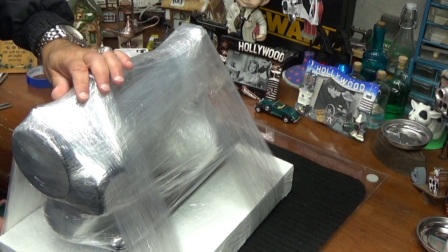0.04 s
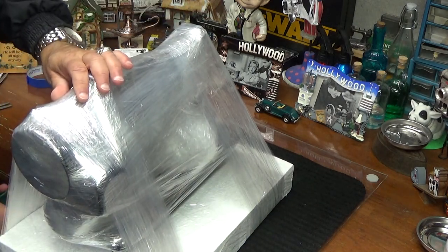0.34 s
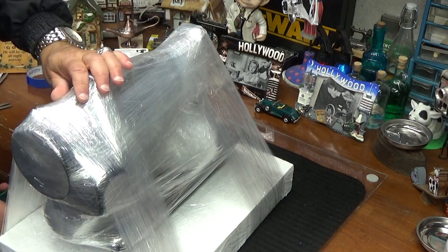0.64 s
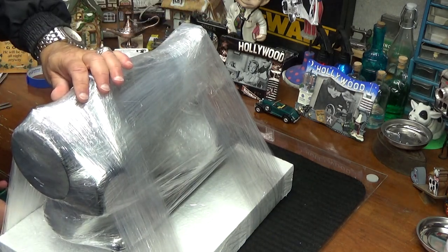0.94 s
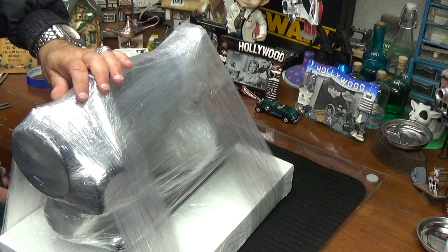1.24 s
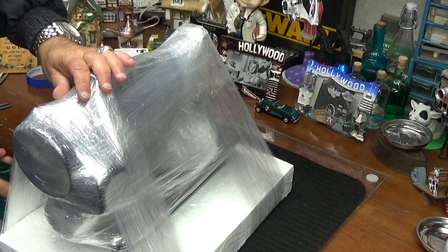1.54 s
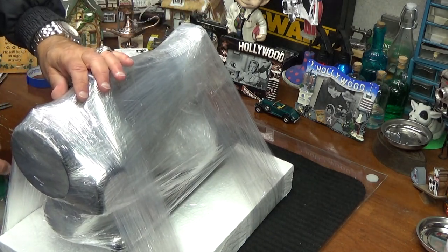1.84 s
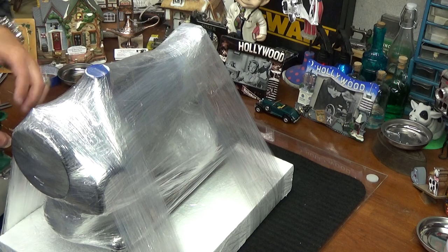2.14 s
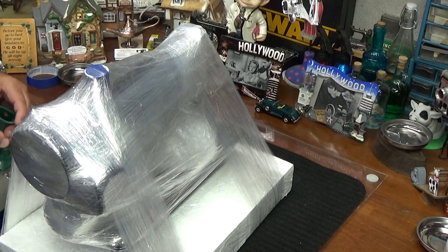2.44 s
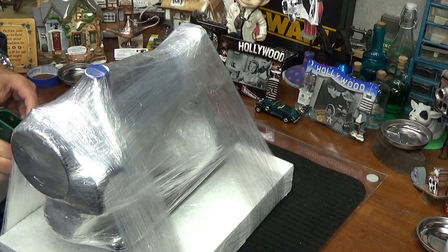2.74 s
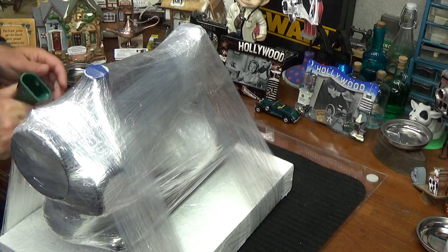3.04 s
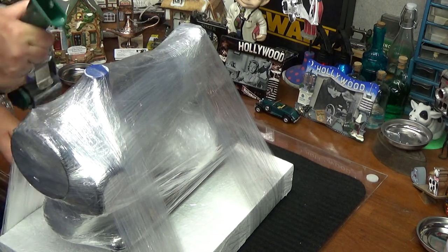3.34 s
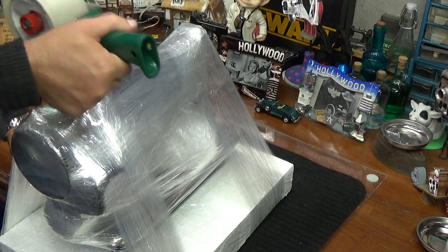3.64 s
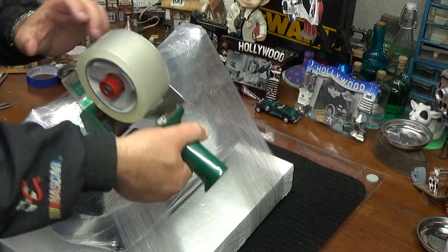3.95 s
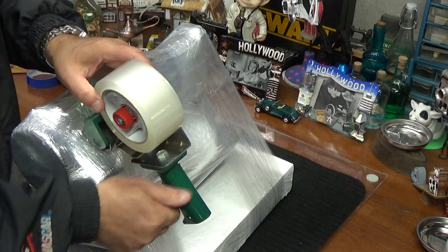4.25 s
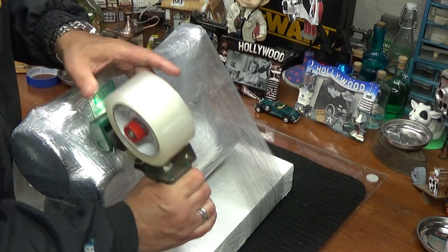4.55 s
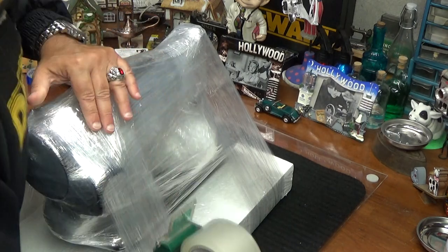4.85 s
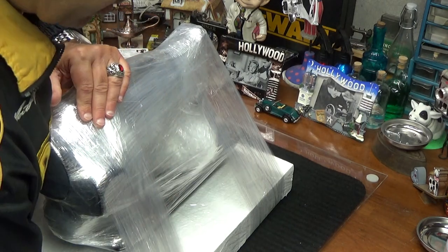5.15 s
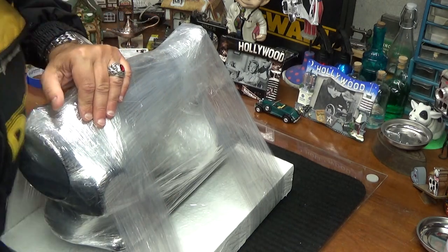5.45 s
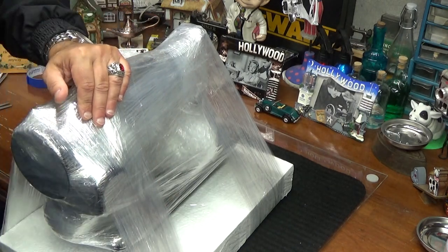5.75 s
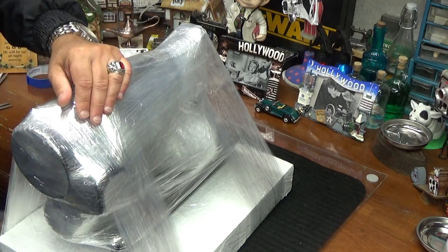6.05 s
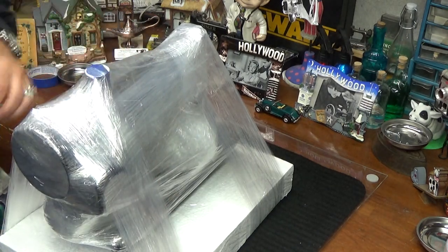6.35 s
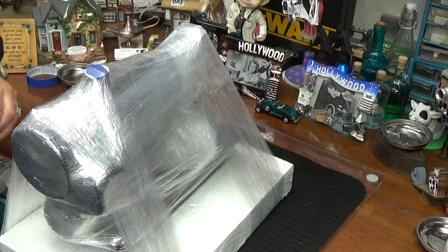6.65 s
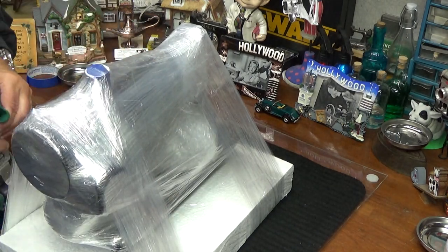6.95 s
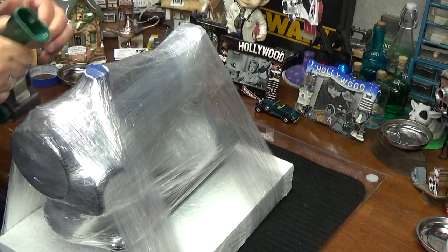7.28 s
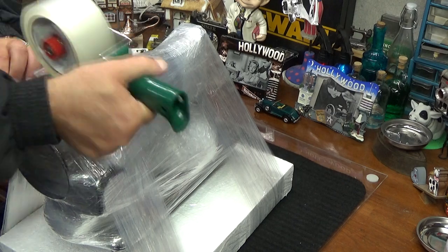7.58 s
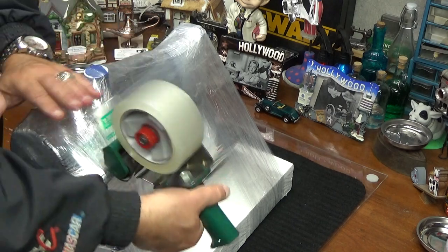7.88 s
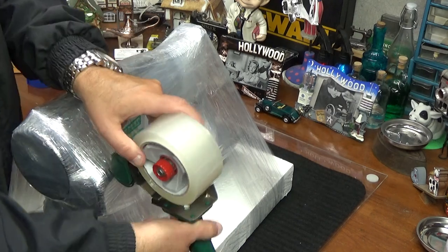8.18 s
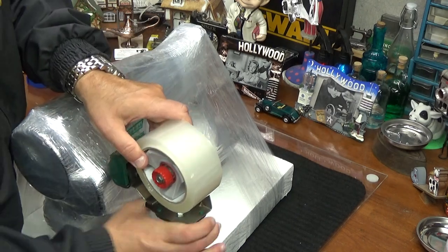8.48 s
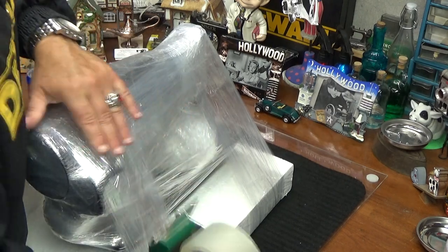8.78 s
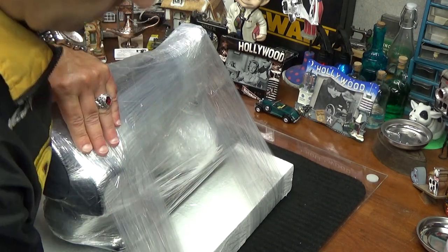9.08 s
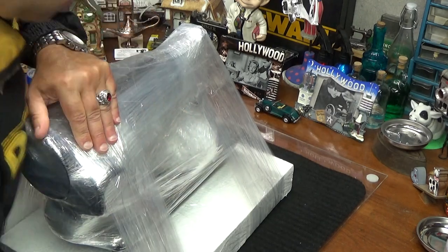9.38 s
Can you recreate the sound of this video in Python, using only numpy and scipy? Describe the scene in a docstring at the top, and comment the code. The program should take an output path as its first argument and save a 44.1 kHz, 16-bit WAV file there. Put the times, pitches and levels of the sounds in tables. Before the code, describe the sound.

Close by in a small workshop, short crackling tugs and quick zips free packing tape from its roll. Longer rasping pulls follow, squealing as they speed up and resonating in the plastic wrap the tape is wound around, with shorter pulls in between. The pauses hold faint crinkling of film and small snaps of creases being pressed down, over a low, even room noise.

```python
"""Short tugs crack packing tape off a hand dispenser; film rustles under a hand and creases tick.
Then the tape is pulled out and wound round a film-wrapped machine on a workshop bench.
It leaves the roll in quick stick-slip jerks: they rasp and squeal in the taut strip and boom in the
wrap, while threads of glue fizz. A small cluttered room answers over its own soft steady noise."""
import sys
import numpy as np
from scipy import signal
from scipy.fft import rfft, irfft, next_fast_len
from scipy.io import wavfile
from scipy.ndimage import uniform_filter1d

SR = 44100
rng = np.random.default_rng(int(sys.argv[2]) if len(sys.argv) > 2 else 0)


def output_pcm(signal):
    """Save a mono or channel-first signal as 16-bit PCM at the path in sys.argv[1].

    Samples are clipped to [-1, 1] before scaling.
    """
    pcm = np.clip(np.atleast_2d(signal).T, -1, 1) * 32767
    wavfile.write(sys.argv[1], SR, np.round(pcm).astype(np.int16))


N = 419832
TIME_S = np.arange(N) / SR
FFT_SIZE = 2 * next_fast_len(N // 2 + SR, True)
FREQ_HZ = np.fft.rfftfreq(FFT_SIZE, 1 / SR)
LEFT_RIGHT = np.array([[1], [-1]])


def undb(db):
    """Decibels to gain."""
    return 10 ** (np.asarray(db) / 20)


def unit(x):
    """Scale to rms 1."""
    return x / np.sqrt(np.mean(x ** 2))


def even(x, span_s=.05):
    """Hold the short-term rms at 1, leaving the fast grain."""
    return x / np.sqrt(np.abs(uniform_filter1d(x ** 2, int(span_s * SR))) + 1e-12)


def walk(rate_hz):
    """Ramps between random levels, rms 1."""
    hold = max(int(SR / rate_hz), 1)
    steps = np.repeat(rng.standard_normal(N // hold + 1), hold)
    return unit(uniform_filter1d(steps, hold)[:N])


def gate(start_s, end_s, edge_s):
    """1 between two moments, with linear ramps."""
    return np.clip(np.minimum(TIME_S - start_s, end_s - TIME_S) / edge_s + .5, 0, 1)


def bump(peak_s, half_s):
    """Gaussian swell, 1/e at half_s from its peak."""
    return np.exp(-((TIME_S - peak_s) / half_s) ** 2)


def cut(x, hz, kind, order=4):
    """Butterworth filter."""
    return signal.sosfilt(signal.butter(order, hz, kind, fs=SR, output="sos"), x)


def fade(x, decay_s):
    """Give every impulse an exponential tail."""
    return signal.lfilter([1], [1, -np.exp(-1 / (decay_s * SR))], x)


def colour(x, spectrum, resonances=()):
    """Minimum-phase filter from a spectrum plus resonances; white noise keeps its power."""
    hz, db = np.transpose(spectrum)
    curve_db = np.interp(np.log(FREQ_HZ + 1), np.log(hz), db)
    for centre_hz, width_hz, lift_db in resonances:
        curve_db += lift_db / (1 + (2 * (FREQ_HZ - centre_hz) / width_hz) ** 2)
    cepstrum = irfft(np.log(unit(undb(curve_db))))
    cepstrum[1:FFT_SIZE // 2] *= 2
    cepstrum[FFT_SIZE // 2:] = 0
    return irfft(np.exp(rfft(cepstrum)) * rfft(x, FFT_SIZE))[..., :N]


# still room: f/Hz, level/dB
ROOM_SPECTRUM = [(12, -24), (20, -9), (81, -4.5), (182, -8), (422, -3), (558, -8.5), (607, -2), (738, -9),
                 (1000, -8), (1150, -10.5), (6720, -17.5), (11400, -24.5), (16000, -42)]


def room_tone(level_db=-55.5, sway_db=.8, side_db=-11):
    """Soft steady noise of the workshop, nearly the same left and right."""
    gain = undb(level_db + sway_db * walk(5))
    mid, side = colour(rng.standard_normal((2, N)), ROOM_SPECTRUM) * gain
    return mid + undb(side_db) * side * LEFT_RIGHT


# resonances of wrap, roll and dispenser: f/Hz, width/Hz, lift/dB
BODY_MODES = [(198, 19, 5.5), (382, 50, -2), (689, 50, 5.5), (960, 86, 3), (1326, 38, 1.5),
              (1710, 46, -3.5), (2185, 36, 4.5), (3150, 48, 0.5), (4530, 260, 1), (8100, 30, 2),
              (10220, 2300, 4.5)]
# tugged strip: f/Hz, level/dB
TUG_SPECTRUM = [(71, -63), (120, -28.5), (557, -2), (789, -15.5), (1400, -5.5), (1790, -7.5), (2290, -3),
                (3740, -8), (4500, -8), (9020, -12.5), (16000, -27.5)]
# tugs freeing a few millimetres of tape: t/s, level/dB
TUG_EVENTS = [(0.0034, -8), (0.092, -10), (0.1061, -10), (0.1745, -3.5), (0.2181, -0.5), (0.521, -16.5),
              (0.598, -3), (0.9615, -2), (1.051, -2.5), (1.0794, -2.5), (1.6838, -8.5), (1.6913, -8.5),
              (5.2728, -24), (6.9037, -18)]


def tugs(slip_hz=240, snap_s=.0012, length_s=.0099, level_db=-6, low_db=1):
    """A tug is a handful of slow slips, each a brief crack of the strip."""
    force = np.zeros(N)
    slip = np.arange(8)
    for start_s, db in TUG_EVENTS:
        delay_s = (slip + .15 * rng.standard_normal(len(slip)) * (slip > 0)) / slip_hz
        at = (np.abs(start_s + delay_s) * SR).astype(int)
        force[at] += undb(db) * np.exp(-(delay_s / length_s) ** 2)
    bright, low = fade(force, snap_s) * rng.standard_normal((2, N))
    bright = cut(bright, 810, "highpass", order=2)
    low = cut(low, [260, 1000], "bandpass", order=2)
    return undb(level_db) * colour(bright + undb(low_db) * low, TUG_SPECTRUM, BODY_MODES)


# creases, rustling or ticking: f/Hz, level/dB
CREASE_SPECTRUM = [(180, -29), (300, -9.5), (1780, -5), (3290, 1), (3640, -2.5), (4370, -1.5), (9880, -1),
                   (13300, -9), (16000, -25)]
# hand smoothing the film: start/s, end/s, level/dB
HAND_RUBS = [(0.312, 1.003, -51.5), (2.329, 2.899, -50.5), (3.899, 4.6, -51.5), (6.549, 7.001, -53.5),
             (7.802, 8.301, -54)]


def rustle(grain_db=4, swell_db=4, level_db=-3, edge_s=.092):
    """Faint crinkling of the film under the hand."""
    grains = unit(rng.standard_normal(N) * undb(grain_db * walk(640) + swell_db * walk(30)))
    rubbing = sum(gate(start_s, end_s, edge_s) * undb(db + level_db) for start_s, end_s, db in HAND_RUBS)
    return colour(grains, CREASE_SPECTRUM) * rubbing


# snapping creases: t/s, level/dB, snap count
CREASE_SNAPS = [(0.7885, -17.5, 2), (0.9415, -20.5, 1), (2.468, -11.5, 1), (2.6178, -22.5, 1),
                (2.689, -13, 1), (4.1433, -10, 1), (4.5167, -16, 2), (4.574, -16.5, 1), (6.9327, -16.5, 2),
                (7.9042, -6, 3), (8.1975, -16.5, 1), (8.3008, -9, 1), (8.3525, -16.5, 1),
                (8.5014, -20.5, 1), (8.5577, -15, 3)]


def ticks(level_db=-3.5, snap_s=.001, gap_s=.016):
    """Creases of tape and film snap as they are pressed down, singly or in a short run."""
    force = np.zeros(N)
    for start_s, db, count in CREASE_SNAPS:
        times_s = start_s + gap_s * np.arange(round(count))
        force[(times_s * SR).astype(int)] += undb(db)
    snaps = fade(force, snap_s) * rng.standard_normal(N)
    return undb(level_db) * colour(snaps, CREASE_SPECTRUM)


# short pulls: start/s, end/s, base slip rate/Hz, rasp/dB, boom/dB, fizz/dB
SHORT_STROKES = [(1.08, 1.238, 499.7, -20, -27, -21), (1.698, 1.844, 420.5, -22, -24, -20),
                 (1.879, 1.91, 259.8, -22, -17.5, -19.5), (1.938, 2.073, 215.4, -22, -26.5, -19.5),
                 (2.1, 2.132, 260, -20, -23, -23), (3.656, 3.876, 418.3, -22.5, -27, -19.5),
                 (5.297, 5.453, 400, -19.5, -26.5, -19.5), (5.501, 5.529, 420, -24.5, -22, -25),
                 (6.344, 6.515, 215, -20.5, -23, -23.5), (9.172, 9.54, 396.4, -18.5, -27.5, -19.5)]
# long pulls: start/s, end/s, base slip rate/Hz, boom/dB, fizz/dB, unevenness/0-1
LONG_STROKES = [(2.902, 3.643, 440.1, -26, -21, .7), (4.597, 5.16, 359.9, -30, -18.5, .4),
                (5.562, 6.31, 539.9, -24.5, -21, .16), (6.989, 7.763, 370.5, -28.5, -21, .55),
                (8.599, 9.145, 419.3, -30.5, -18, 0.42)]
# arm effort, one curve per long pull: t/s, rasp level/dB
EFFORT_CURVES = [
    [(2.915, -25.5), (2.929, -27), (2.935, -21.5), (3.111, -15.5), (3.481, -21.5), (3.559, -28),
     (3.635, -29)],
    [(4.625, -23.5), (4.659, -24), (4.775, -25), (4.825, -23), (4.979, -24), (5.057, -21), (5.15, -19.5)],
    [(5.575, -19.5), (5.703, -20), (5.729, -23), (5.907, -21), (5.931, -22.5), (6.193, -17.5), (6.3, -24)],
    [(7.0, -17.5), (7.16, -16), (7.362, -18.5), (7.422, -22), (7.598, -20), (7.755, -29.5)],
    [(8.615, -31), (8.701, -25.5), (8.955, -30), (8.981, -21), (9.023, -27.5), (9.061, -19), (9.135, -17.5)],
]
# arm speeding up, slips quickening to a screech: peak/s, rise/s, fall/s, height/octaves
ARM_SURGES = [(1.172, .04, .045, .4), (1.745, .025, 0.068, 0.64), (3.045, 0.049, .18, 1.72),
              (5.1, .18, .15, .8), (5.365, .04, 0.049, .4), (6.11, .05, .1, 1.06), (7.18, .09, 0.17, 1.15),
              (9.06, .06, .12, 0.67)]


def pulls(spin_s=.03, spin_octaves=.35, breakaway_db=.5, breakaway_s=.0027, usual_effort_db=-21.5,
          surge_db_per_octave=4, short_unevenness=.17, boom_build_s=.0056, boom_limit_hz=815):
    """The arm's speed and effort set slip rate, unevenness and the gains of rasp, boom and fizz."""
    surge_octaves = sum(octaves * bump(peak_s, np.where(TIME_S < peak_s, rise_s, fall_s))
                        for peak_s, rise_s, fall_s, octaves in ARM_SURGES)
    strokes = [(start_s, end_s, hz, boom_db, fizz_db, short_unevenness,
                rasp_db + surge_db_per_octave * surge_octaves)
               for start_s, end_s, hz, rasp_db, boom_db, fizz_db in SHORT_STROKES]
    strokes += [(*stroke, np.interp(TIME_S, *np.transpose(effort)))
                for stroke, effort in zip(LONG_STROKES, EFFORT_CURVES)]
    slip_hz, unevenness, gains = np.full(N, 300.), np.zeros(N), np.zeros((3, N))
    for start_s, end_s, base_hz, boom_db, fizz_db, uneven, effort_db in strokes:
        running = gate(start_s, end_s, edge_s=.0027)
        on = running > 0
        age_s, left_s = np.abs(TIME_S[on] - start_s), np.abs(end_s - TIME_S[on])
        # the roll takes a moment to spin up and to stop
        sag_octaves = spin_octaves * (np.exp(-age_s / spin_s) + np.exp(-left_s / spin_s))
        slip_hz[on] = base_hz * 2 ** (surge_octaves[on] - sag_octaves)
        unevenness[on] = uneven
        extra_db = effort_db[on] - usual_effort_db
        crack_db = breakaway_db * np.exp(-age_s / breakaway_s)
        # the wrap starts late and cannot follow very fast slips
        wrap = (1 - np.exp(-age_s / boom_build_s)) / np.hypot(1, (slip_hz[on] / boom_limit_hz) ** 5)
        rasp = undb(effort_db[on] + crack_db)
        boom = wrap * undb(boom_db + .99 * extra_db)
        fizz = undb(fizz_db + .05 * extra_db + crack_db)
        gains[:, on] = running[on] * [rasp, boom, fizz]
    return slip_hz, unevenness, gains


def slips(hz, wander, jitter=.07, size_db=3.5):
    """One lane of the peel line: a click at each slip, uneven in spacing and size."""
    step = hz * np.exp(wander * walk(45) + jitter * walk(600)) / SR
    phase = np.cumsum(step)
    at = np.flatnonzero(np.diff(np.floor(phase)))
    late_samples = np.clip(1 - phase[at + 1] % 1 / step[at], 0, 1)
    size = undb(size_db * walk(700))[at]
    clicks = np.zeros(N)
    clicks[at] += size * (1 - late_samples)
    clicks[at + 1] += size * late_samples
    return clicks


def stick_slip(hz, unevenness, lock_hz=965.8, edge_db=-4, flutter_db=-1.5):
    """Middle and edges of the tape slip separately; fast slips lock to one rate and sound cleaner."""
    loose = 1 / np.hypot(1, (hz / lock_hz) ** 4)
    middle = slips(hz, wander=.25 * unevenness * loose, jitter=.24 * unevenness * loose)
    edges = slips(hz, wander=.13 * loose) + slips(hz, wander=.22 * loose)
    return (middle + undb(edge_db) * edges) * undb(flutter_db * walk(150))


def glue_threads(jerks, snap_s=.00044, steady=.75, grain_db=2):
    """Every slip snaps a spray of glue threads; a steady share parts in between."""
    spray = even(fade(jerks, snap_s)) + steady
    return even(spray * rng.standard_normal(N) * undb(grain_db * walk(1500)))


# roll swinging close by: t/s, half length/s, top lift/dB
ROLL_PASSES = [(5.05, 1, 3), (7.6, .25, 2.5), (8.849, 0.52, 1.5)]


def glue_fizz(glue, lightness, split_hz=9500, far_top_db=-1.5, sizzle=.4):
    """Treble of the parting glue; its top comes through on light pulls and when the roll is near."""
    top_db = far_top_db + sum(db * bump(peak_s, half_s) for peak_s, half_s, db in ROLL_PASSES)
    body = cut(glue, split_hz, "lowpass", order=3)
    top = undb(top_db) * lightness ** sizzle * cut(glue, split_hz, "highpass", order=3)
    return even(cut(body + top, 3500, "highpass"))


# taut strip and wrap: f/Hz, level/dB
TAPE_SPECTRUM = [(53, -70), (90, -29), (205, -15), (265, -9), (380, 5.5), (499, -2.5), (690, 0), (780, -7),
                 (1210, -2.5), (1470, -2.5), (2590, -4.5), (3510, -9), (9930, -13.5), (13700, -22.5),
                 (16000, -31.5)]


def peeling(tear_db=-6):
    """Jerks and glue threads drive the rasp of the strip, the boom of the wrap and the fizz."""
    slip_hz, unevenness, (rasp_gain, boom_gain, fizz_gain) = pulls()
    jerks = stick_slip(slip_hz, unevenness)
    threads = glue_threads(jerks)
    drive = even(jerks) + undb(tear_db) * threads
    strip, glue = colour(np.array([drive, threads]), TAPE_SPECTRUM, BODY_MODES)
    rasp = even(cut(strip, [800, 3500], "bandpass"))
    rasp = even(rasp + squeals(threads))
    lows = cut(strip, 800, "lowpass", order=6)
    boom = even(cut(lows, 140, "highpass"))  # thin film radiates no deep bass
    fizz = glue_fizz(glue, lightness=(fizz_gain + 1e-6) / (rasp_gain + 1e-6))
    return rasp_gain * rasp + boom_gain * boom + fizz_gain * fizz


# strip taut enough to squeal: t/s, half length/s, f/Hz, width/Hz, level/dB re rasp
STRIP_SQUEALS = [(1.184, 0.043, 2520, 250, -2.5), (3.291, 0.043, 1690, 120.1, 5),
                 (3.325, 0.13, 1190, 714, 11), (5.03, 0.18, 1261, 150.3, -1),
                 (5.341, 0.053, 1552, 449.3, -2.5), (5.655, 0.11, 1344, 160, -3),
                 (6.121, 0.11, 2646, 250, -4), (6.137, 0.11, 5150, 2812, -10.5),
                 (7.18, 0.064, 1768, 399.5, -1.5), (7.242, 0.18, 1330, 707, 4.5),
                 (7.54, 0.12, 981.6, 159.5, -2), (9.06, 0.12, 1335, 320, -1), (9.125, 0.087, 4615, 300, -7)]


def squeals(drive):
    """Peeling rings a resonance of the free strip, which swells and fades with its tension."""
    out = np.zeros(N)
    for peak_s, half_s, hz, width_hz, db in STRIP_SQUEALS:
        on = np.abs(TIME_S - peak_s) < 2 * half_s
        spread = 1 + width_hz / hz / 2
        ring = unit(cut(drive[on], [hz / spread, hz * spread], "bandpass", order=2))
        out[on] += ring * undb(db) * bump(peak_s, half_s)[on]
    return out


def workshop(x, wet_db, left_db, early_t60_s=.1, late_t60_s=.24, late_db=-11, side_db=-11):
    """Direct sound, dense reflections from bench and shelves, then a short weak tail."""
    t = TIME_S[:SR // 2]
    decay = (undb(-60 * t / early_t60_s) + undb(late_db - 60 * t / late_t60_s)) * (t > .001)
    mid, side = rng.standard_normal((2, len(t))) * decay / np.sqrt(np.sum(decay ** 2)) * undb(wet_db)
    mid[0] += 1  # direct path
    response = (mid + undb(side_db) * side * LEFT_RIGHT) / np.sqrt(np.sum(mid ** 2))
    balance = undb(left_db * LEFT_RIGHT / 2)
    return signal.fftconvolve(x[None], response * balance, axes=1)[:, :N]


def moving_reflections(tape, patterns=5, base_rate_hz=18):
    """As the arm moves and the strip flaps, one pattern of reflections gives way to the next."""
    place = np.cumsum(base_rate_hz * undb(2 * walk(4))) / SR
    shares = [np.maximum(1 - np.abs((place + k) % patterns - patterns / 2), 0) for k in range(patterns)]
    return sum(workshop(tape * share, wet_db=.5, left_db=.5) for share in shares)


def scene(boom_lean=.11, tape_db=-.13):
    """Tape and ticks sound slightly left, the boom more so; the ticks are drier."""
    tape = moving_reflections(peeling() + tugs())
    tape += boom_lean * cut(tape, 1000, "lowpass", order=1) * LEFT_RIGHT
    creases = workshop(ticks(), wet_db=-1.5, left_db=.8)
    return undb(tape_db) * tape + creases + rustle() + room_tone()


def record(dry):
    """Round the highest peaks and cut the top treble."""
    ceiling, top_hz = .68, 15900
    rounded = dry / (1 + (dry / ceiling) ** 4) ** .25
    return signal.sosfilt(signal.ellip(10, .2, 70, top_hz, fs=SR, output="sos"), rounded)


dry = scene()
out = record(dry)
output_pcm(out)
```